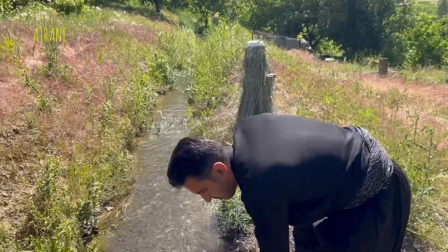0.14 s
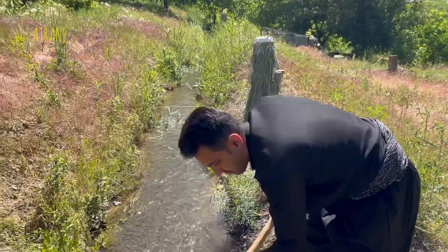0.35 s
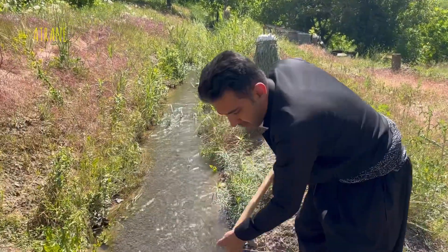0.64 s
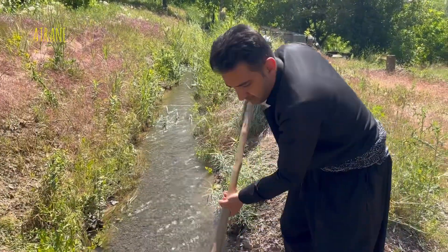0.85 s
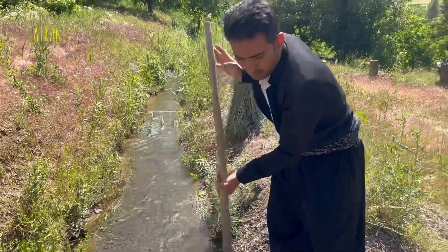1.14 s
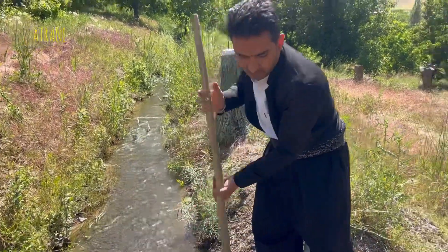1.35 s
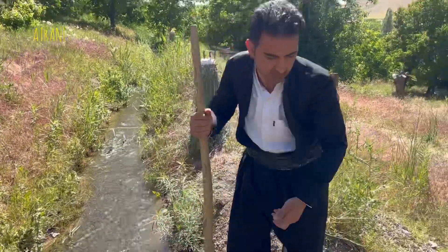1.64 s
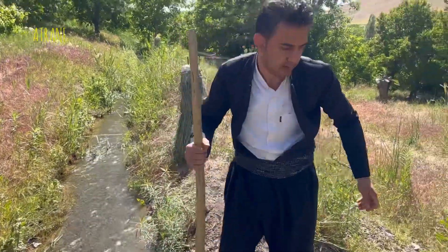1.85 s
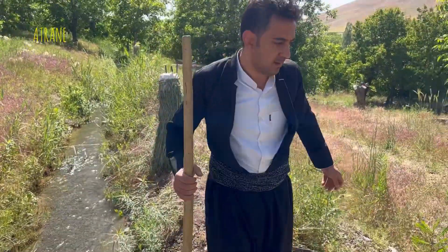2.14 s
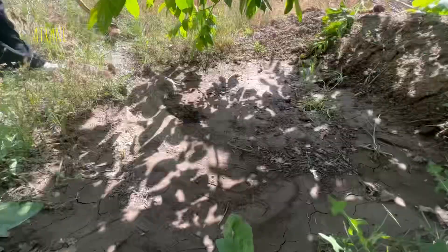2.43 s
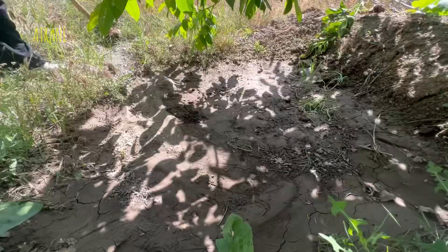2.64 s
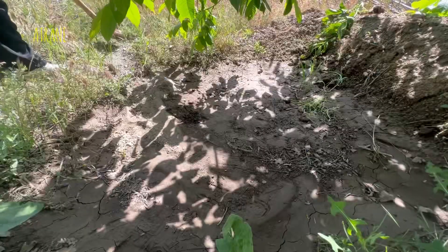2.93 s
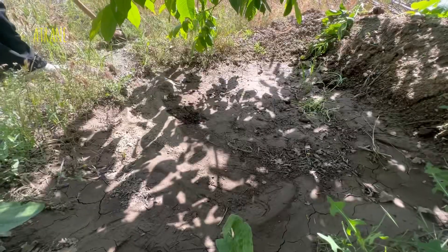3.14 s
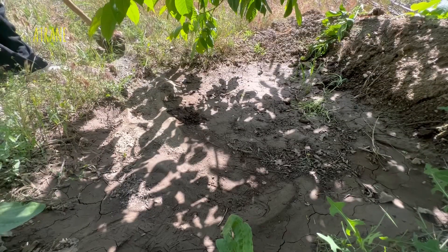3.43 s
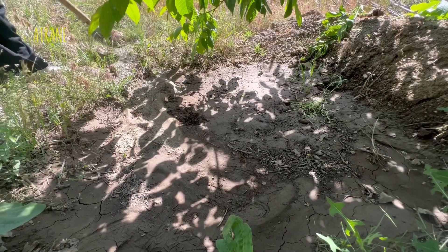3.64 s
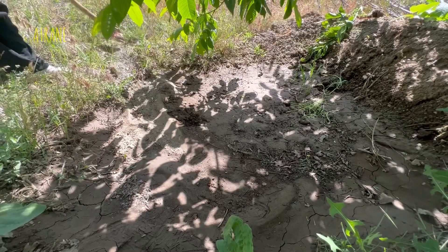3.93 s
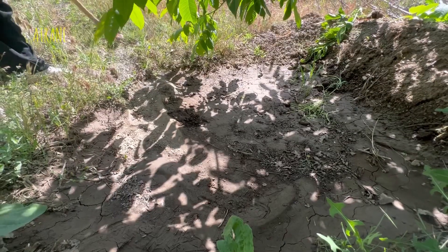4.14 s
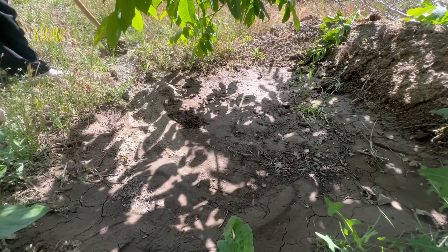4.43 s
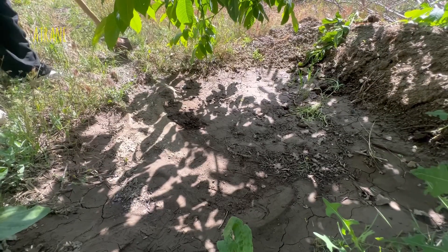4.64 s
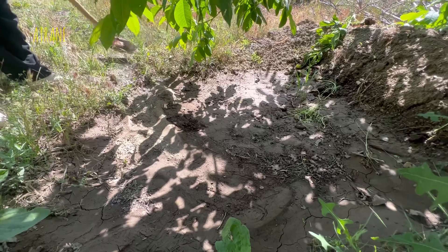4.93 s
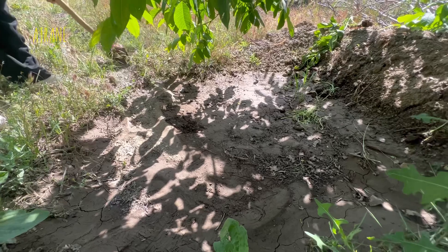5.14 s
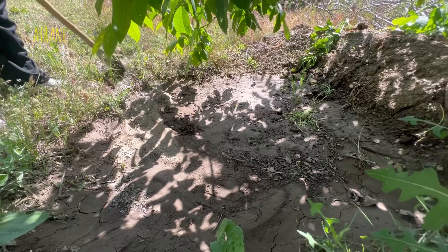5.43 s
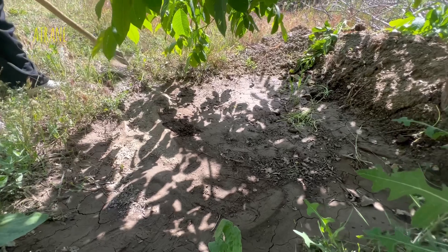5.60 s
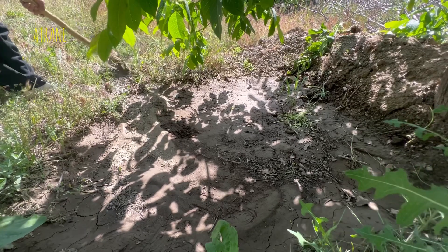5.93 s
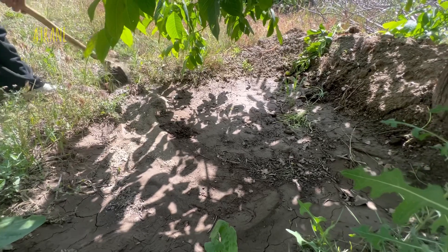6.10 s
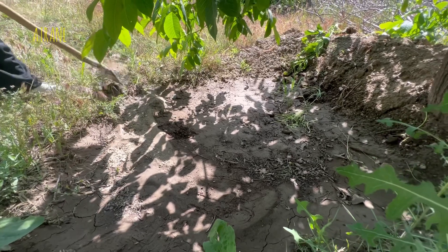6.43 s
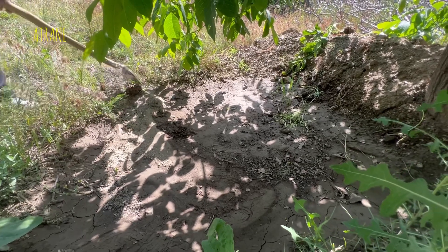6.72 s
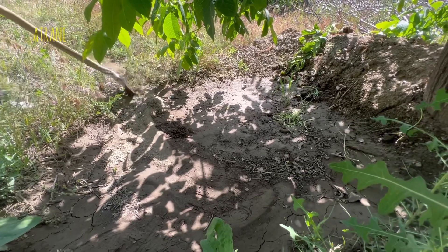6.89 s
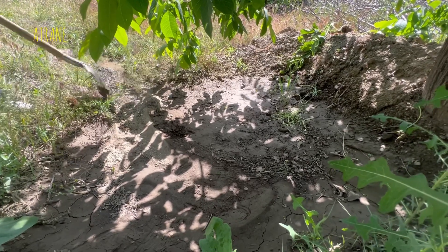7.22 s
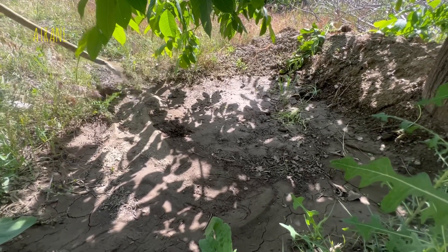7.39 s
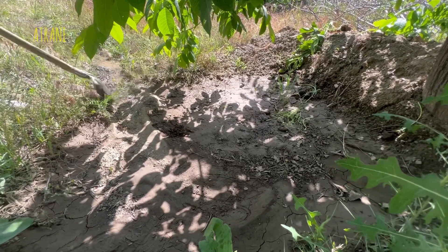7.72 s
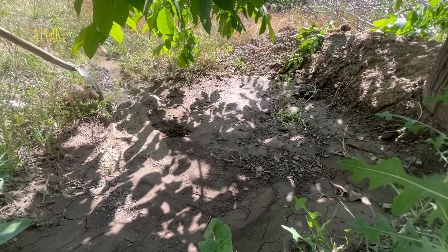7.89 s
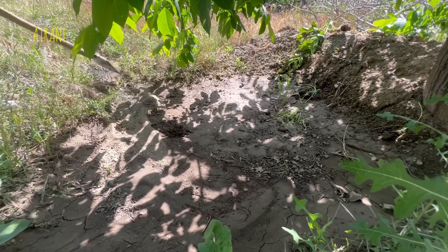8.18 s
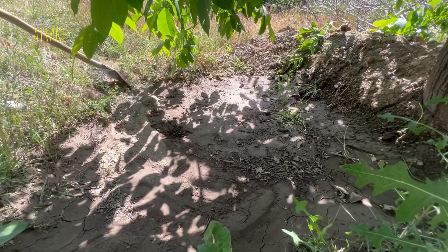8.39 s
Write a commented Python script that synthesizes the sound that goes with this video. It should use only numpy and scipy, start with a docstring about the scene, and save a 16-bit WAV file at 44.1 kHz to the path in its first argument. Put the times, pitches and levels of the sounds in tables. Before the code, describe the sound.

On an open bank, a hand stirs shallow water with quick bubbly plops, followed by a quiet gap and a dry double knock of a spade handle. The place then changes to tree shade, where a spade chops damp, stony soil three times, pushes through it twice with long gritty scrapes, and skims lightly three times. Crumbs patter after each stroke. Close stereo pickup, spade towards the left, with faint water and insects behind.

```python
"""First a hand dabbles in a muddy channel and a spade handle is grabbed with a knock, on an open bank.
Then, in the shade of a tree, the spade works damp soil: three chops, two long gritty pushes, three light skims.
The scrapes are bursts of noise broken into grains, filtered by the soil and by the ringing steel of the blade.
Bright clicks, mostly pebbles, are short pings and cracks; bubbles are fading tones that rise in pitch.
Far-off water and insects are steady filtered noise, with a puff of wind on the bank."""
import sys
import numpy as np
from scipy import signal
from scipy.fft import rfft, irfft, next_fast_len
from scipy.io import wavfile

SR = 44100
rng = np.random.default_rng(int(sys.argv[2]) if len(sys.argv) > 2 else 0)


def transcribe(u):
    """Save the signal u as a 16-bit wav file named by the first command-line argument.

    u: samples, shape (n,) or (channels, n), limited to [-1, 1]; the rate is SR.
    q: integer samples, one column per channel.
    """
    v = np.clip(np.atleast_2d(u).T, -1, 1)
    q = np.round(v * 32767).astype(np.int16)
    wavfile.write(sys.argv[1], SR, q)


N = 377055

# bright clicks: mostly pebbles on the blade edge, with a few dry stems or ticks;
# each use adds its own level: (t/s, level/dB, ring f/Hz)
BRIGHT_CLICKS = [(2.4825, -20, 4275), (2.5882, -20.5, 4480), (2.937, -43, 7280), (3.191, -20.5, 4260),
                 (3.217, -23, 4400), (3.255, -14, 3080), (3.3408, -19, 3700), (3.354, -17, 4040),
                 (3.426, -23, 4300), (3.6086, -36.5, 8810), (4.2198, -13.5, 5520), (4.239, -15.5, 4400),
                 (4.361, -18.5, 4380), (4.403, -16.5, 4340), (4.44, -20, 4510), (4.6618, -37.5, 4800),
                 (5.0207, -22, 4080), (5.14, -18, 4650), (5.1705, -14, 4650), (5.885, -16, 3590),
                 (5.9234, -17, 8060), (5.958, -19, 7030), (6.005, -27, 8600), (6.0214, -15, 6650),
                 (6.102, -15.5, 4900), (6.154, -20, 6900), (6.223, -21, 5100), (6.747, -37, 6450),
                 (7.627, -23, 4180), (7.655, -18, 4830), (8.3581, -25.5, 4580), (8.3917, -21, 4660),
                 (8.5028, -22, 4600)]
# colour of small bright snaps: (f/Hz, level/dB per Hz)
SNAP_COLOUR = [(1500, -2), (4000, -10), (7000, 6.5), (12000, -8), (16000, 7)]
# the blade is dragged through the soil; the scrape and crumb settings shift these levels:
# (t/s, length/s, crest after start/s, crest level/dB, arch/dB per s^2, release/dB per s,
#  bass weight at the crest/dB, treble grit at the crest/dB, spilled soil level/dB)
SOIL_DRAGS = [(2.488, 0.25, 0.33, -31, 75, 270, 3.5, -1.5, -59),
              (3.187, 0.27, 0.14, -26.5, 165, 282, 1, -5, -57),
              (4.267, 0.3, 0.19, -26.5, 353, 153, 0.5, -3, -57.5),
              (5.046, 0.34, .18, -23.5, 262, 380, -3.5, -2, -57.5),
              (5.88, 0.54, 0.14, -23.5, 88, 384, -1.5, 3, -56.5),
              (6.70, 0.32, 0.24, -36.5, 337, 151, 4.5, 1.5, -50),
              (7.574, 0.22, 0.12, -28, 1250, 162, 3, -0.5, -57),
              (8.398, .17, 0.18, -34.5, 50, 258, 3.5, -3, -60)]

MOVE_S = 2.36   # from the bank to the shade of the tree
T = np.arange(N) / SR
AGE = T[:2 * SR]   # time since an event began, in s
SIZE = next_fast_len(N + 8192)   # filter length, with room for tails
SIZE += SIZE % 2
HZ = np.maximum(np.arange(SIZE // 2 + 1) * SR / SIZE, 1)


def from_db(db):
    """Turns decibels into an amplitude factor."""
    return 10 ** (np.asarray(db) / 20)


def at_hz(points, hz=HZ, axis=1):
    """Reads one column of a spectrum on a log-frequency axis."""
    points = np.array(points)
    return np.interp(np.log(hz), np.log(points[:, 0]), points[:, axis])


def bell(hz, width):
    """Shape of a resonance around hz, 1 at the top."""
    return 1 / (1 + (2 * (HZ - hz) / width) ** 2)


def colour(x, spectrum_db):
    """Filters with this shape and no sound ahead of time (minimum phase); white noise keeps its power."""
    gain = from_db(spectrum_db)
    cepstrum = irfft(np.log(gain / np.sqrt(np.mean(gain ** 2))))
    # folding the cepstrum forward puts the whole response after its cause
    cepstrum[1:SIZE // 2] *= 2
    cepstrum[SIZE // 2 + 1:] = 0
    response = np.exp(rfft(cepstrum))
    return irfft(rfft(x, SIZE) * response)[..., :N]


def low_part(x, hz):
    """Keeps what lies below hz, without delay."""
    lowpass = signal.butter(2, hz, fs=SR, output="sos")
    return signal.sosfiltfilt(lowpass, x)


def add(out, s, sound):
    """Mixes a short sound in at time s."""
    start = int(np.clip(s * SR, 0, N - 1))
    out[start:start + len(sound)] += sound[:N - start]


def dying(t60):
    """Time axis and amplitude of a decay that loses 60 dB in t60 seconds."""
    t = np.arange(int(max(t60, .002) * SR * 1.2)) / SR
    return t, from_db(-60 * t / t60)


def bursts(rows):
    """Power envelope of sudden blows, each (t/s, level/dB, t60/s)."""
    power = np.zeros(N)
    for s, db, t60 in rows:
        _, fade = dying(t60)
        add(power, s, (from_db(db) * fade) ** 2)
    return power


def swell(attack, hold, fade_db_per_s):
    """Power envelope that rises, stays up until hold and then fades evenly in dB."""
    rise = np.minimum(AGE / max(attack, .001), 1) ** 2
    return rise * from_db(-fade_db_per_s * np.maximum(AGE - hold, 0)) ** 2


def grains(per_s, spread_db, t60):
    """Power envelope of many small random fractures, each dying away; its mean is 1."""
    starts = rng.random(N) < per_s / SR
    loudness_db = spread_db * np.minimum(rng.exponential(1, N), 3.5)
    sizes = starts * from_db(loudness_db) ** 2
    fade_per_sample = from_db(-120 / (t60 * SR))   # doubled dB because this is power
    power = signal.lfilter([1], [1, -fade_per_sample], sizes + 1e-18)
    return power / power.mean()


def drift(rate):
    """A slow random wander through rate new points a second."""
    points = rng.standard_normal(int(T[-1] * rate) + 2)
    return 1.2 * np.interp(T * rate, np.arange(len(points)), points)


def airy_noise(alike):
    """White stereo noise, partly the same on both sides."""
    alike = np.clip(alike, 0, 1)
    shared = rng.standard_normal(N)
    separate = rng.standard_normal((2, N))
    return np.sqrt(alike) * shared + np.sqrt(1 - alike) * separate


def wind_strength():
    """A light breeze on the open bank, with one puff that swells and dies away."""
    breeze_db, puff_db = -78.5, -63
    power = from_db(breeze_db) ** 2 * (T < MOVE_S)
    add(power, 0.555, from_db(puff_db) ** 2 * swell(attack=0.099, hold=0.465, fade_db_per_s=200))
    return np.sqrt(power)


def outdoors(bank_db, pan_db):
    """Trickling noise on the bank, smoother noise with insects under the tree, and rumbling wind."""
    # distant water and insects in the two places: (f/Hz, level/dB per Hz)
    bank_colour = [(25, -18), (60, 0.5), (150, 2), (400, 2.5), (900, -6), (2000, -2), (3300, -5.5),
                   (5000, -4), (6200, -1.5), (7100, 3.5), (8000, 0.5), (9200, -22), (15500, -3.5)]
    shade_colour = [(25, -4), (60, 2), (150, -1.5), (400, -3.5), (900, -5.5), (2000, -3), (3300, -9.5),
                    (5000, -10.5), (6200, -2), (7100, 2.5), (8000, -3.5), (10000, -13), (12500, -36),
                    (15500, -20)]
    # water and insects under the tree, before panning: (t/s, level/dB)
    shade_level = [(2.4, -59), (4, -61.5), (5.7, -58.5), (6.6, -59.5), (7.3, -60), (7.95, -60), (8.25, -65)]
    # the thin band of the insects: (f/Hz, width/Hz, lift/dB)
    insect_band = (7320, 100, 2.3)
    # wind on the microphone: (f/Hz, level/dB per Hz)
    wind_colour = [(20, -21), (45, 0), (75, -3.5), (130, -15), (400, -35), (2000, -78)]
    trickle = np.sqrt(.5 + .5 * grains(per_s=300, spread_db=3, t60=0.0075))
    bank = from_db(bank_db) * colour(airy_noise(0.53) * trickle, at_hz(bank_colour))
    hz, width, lift_db = insect_band
    air = colour(airy_noise(0.1), at_hz(shade_colour) + lift_db * bell(hz, width))
    times, levels_db = np.transpose(shade_level)
    sides = from_db([[pan_db / 2], [-pan_db / 2]])
    shade = from_db(np.interp(T, times, levels_db)) * air * sides
    flutter = from_db(1.6 * drift(24.64))
    wind = wind_strength() * flutter * colour(airy_noise(0.95), at_hz(wind_colour))
    return np.where(T < MOVE_S, bank, shade) + wind


def ticks(tick_db, t60):
    """Droplets and dry stems make tiny bright snaps of noise."""
    # level before tick_db is added: (t/s, level/dB)
    tick_rows = [(0.0435, -26), (0.175, -27), (0.402, -29), (0.5386, -29), (0.6244, -30), (0.6726, -31),
                 (1.099, -35), (1.1545, -27), (1.4663, -17), (3.528, -26.5), (4.9187, -50), (6.552, -41),
                 (6.748, -22.5)]
    power = bursts([(s, db + tick_db, t60) for s, db in tick_rows])
    return colour(airy_noise(0.25) * np.sqrt(power), at_hz(SNAP_COLOUR))


def bubble(hz, cycles, rise):
    """A trapped bubble fades by 60 dB over some cycles of hz, rising in pitch as it nears the surface."""
    t, fade = dying(cycles / hz)
    onset = 1 - np.exp(-2 * hz * t)
    return fade * onset * np.sin(2 * np.pi * hz * t * (1 + rise * t * hz / cycles))


def stirring():
    """How hard the water moves: each splash swells and dies away over a steady trickle."""
    # the hand stirs the water; fizz and wash shift these levels: (t/s, level/dB, hold/s)
    splash_rows = [(0.022, -45, 0.054), (0.13, -50, 0.073), (0.278, -54.5, 0.094), (0.457, -48, .06),
                   (0.544, -54, 0.088), (1.737, -60.5, 0.073), (2.079, -52.5, 0.062), (2.221, -67, .09)]
    trickle_db = -64.5   # shifted in the same way
    power = np.full(N, from_db(trickle_db) ** 2)
    for s, db, hold in splash_rows:
        add(power, s, from_db(db) ** 2 * swell(attack=0.016, hold=hold, fade_db_per_s=149))
    return np.sqrt(power) * (T < MOVE_S)


def little_bubbles(count=1100):
    """A crowd of small bubbles scattered over the time at the bank, brought to an even overall level."""
    crowd = np.zeros((2, N))
    for when, pitch, size, side, depth in rng.random(size=(count, 5)):
        # most bubbles are of one middling size, and these are also the loudest
        hz = np.clip(2000 * (pitch / (1 - pitch)) ** .27, 550, 7500)
        loudness = from_db(13.7 * size ** 2) / (1 + (hz / 4200) ** 2) / (1 + (900 / hz) ** 2)
        # shallow bubbles ring briefly and chirp, deep ones hold their pitch
        small = loudness * bubble(hz, cycles=14 + 32 * depth, rise=0.32 * (1 - depth))
        add(crowd[0], when * MOVE_S, small * np.sqrt(side))
        add(crowd[1], when * MOVE_S, small * np.sqrt(1 - side))
    return crowd / crowd[:, T < MOVE_S].std()


def water(plop_db, slap_db, fizz_db, wash_db, pan_db):
    """A few large bubbles, each born in a small slap, over a crowd of little ones and a soft wash."""
    # larger bubbles; plop and slap shift the level: (t/s, level/dB, nominal f/Hz)
    plop_rows = [(0.044, -43, 1210), (0.068, -54, 1690), (0.085, -36, 1820), (0.12, -39, 2340),
                 (0.151, -41.5, 2200), (0.195, -44.5, 657), (0.278, -48, 1090), (0.334, -48, 1460),
                 (0.43, -40.5, 2260), (0.456, -38, 1120), (0.474, -39.5, 2180), (0.531, -54, 544),
                 (0.567, -49, 1630), (0.625, -44, 2830), (0.645, -55, 636), (0.674, -44, 2440),
                 (0.752, -47, 2540), (0.784, -55, 1360), (2.008, -50, 2200), (2.345, -59, 425)]
    # wash of the moving water: (f/Hz, level/dB per Hz)
    wash_colour = [(150, -20), (400, -27), (600, 0), (1200, -1), (2500, 6.5), (4000, -9), (6500, 1),
                   (9000, -12), (15000, -10)]
    plops = np.zeros((2, N))
    leans_db = rng.normal(pan_db, 2, len(plop_rows))   # mostly towards the left
    for (s, db, hz), lean in zip(plop_rows, leans_db):
        # starting below the nominal pitch, since it rises
        plop = from_db(db + plop_db) * bubble(hz * .93, cycles=61, rise=0.363)
        add(plops[0], s, plop * from_db(lean / 2))
        add(plops[1], s, plop * from_db(-lean / 2))
    splash = stirring()
    fizz = splash * from_db(fizz_db) * little_bubbles()
    churn = (splash * from_db(wash_db)) ** 2 * grains(per_s=1100, spread_db=3.0, t60=0.039)
    slaps = bursts([(s, db + slap_db, .05) for s, db, hz in plop_rows])
    wash = colour(airy_noise(0.33) * np.sqrt(churn + slaps), at_hz(wash_colour))
    return plops + fizz + wash


def knock():
    """The spade is jolted by its handle: a dry double clack of noise."""
    # (t/s, level/dB, t60/s)
    knock_rows = [(1.469, -30.5, 0.044), (1.476, -45, 0.089)]
    # (f/Hz, level/dB per Hz)
    knock_colour = [(100, -12), (400, -7), (1000, -3), (1660, -3), (2800, 2.5), (4300, 1), (6000, 6),
                    (9000, -8), (15000, -6)]
    return colour(airy_noise(0.66) * np.sqrt(bursts(knock_rows)), at_hz(knock_colour))


def settling_crumbs(crumb_db, fall_s, spread_db, t60, count=60):
    """Spilled soil patters into the grass: thickly as a drag ends, then ever more thinly and softly."""
    fade_db_per_s = 21
    falls = []
    for s, length, *_, spill_db in SOIL_DRAGS:
        delays = rng.exponential(fall_s, count)
        sizes_db = rng.normal(0, spread_db, count)
        for delay, size_db in zip(delays, sizes_db):
            level_db = spill_db + crumb_db + size_db - fade_db_per_s * delay
            falls.append((s + length + delay, level_db, t60))
    power = bursts([row for row in falls if row[0] < T[-1]])
    return colour(airy_noise(0.54) * np.sqrt(power), at_hz(SNAP_COLOUR))


def singing_blade():
    """Low modes of the steel, near 1200 and 1665 Hz, ring on undamped, kept wavering by sliding crumbs."""
    # the blade sings, once with the knock and then among the strokes: (t/s, level/dB, f/Hz, t60/s)
    sing_rows = [(1.467, -38, 1663, 0.079), (4.291, -41, 1200, 0.11), (6.408, -53.5, 1200, 0.31),
                 (7.0, -49.5, 1665, 0.24), (7.80, -53, 1665, 0.46)]
    out = np.zeros(N)
    for s, db, hz, t60 in sing_rows:
        t, fade = dying(t60)
        waver = (1 + .6 * (drift(70) + 1j * drift(70)))[:len(t)]   # in loudness and phase
        onset = 1 - np.exp(-t / 0.0017)
        add(out, s, from_db(db) * fade * onset * np.imag(waver * np.exp(2j * np.pi * hz * t)))
    return out


def bright_clicks(ring_db, crack_db, ring_t60, crack_t60):
    """Each click, mostly a pebble on the steel, is a bright crack of noise and a very short ping."""
    cracks = bursts([(s, db + crack_db, crack_t60) for s, db, hz in BRIGHT_CLICKS])
    out = colour(rng.standard_normal(N) * np.sqrt(cracks), at_hz(SNAP_COLOUR))
    for s, db, hz in BRIGHT_CLICKS:
        t, fade = dying(ring_t60)
        add(out, s, from_db(db + ring_db) * fade * np.sin(2 * np.pi * hz * t))
    return out


def falling_clods():
    """Clods of soil drop with a dull bump of noise."""
    # (t/s, level/dB, t60/s)
    clod_rows = [(2.449, -41, 0.06), (3.354, -26, 0.095), (4.239, -43, 0.039), (4.44, -33.5, 0.12),
                 (5.886, -29, 0.16), (6.075, -28.5, 0.095), (7.915, -55, 0.25), (8.482, -40, 0.15)]
    # (f/Hz, level/dB per Hz)
    clod_colour = [(40, -16), (130, -1), (550, 1.5), (900, -1), (2500, -4), (5000, -36)]
    return colour(rng.standard_normal(N) * np.sqrt(bursts(clod_rows)), at_hz(clod_colour))


def crumbling_noise(patchy_db, rate, count=30):
    """Two unrelated noises whose bands swell and fade as crumbs of different size pass the blade."""
    white = rfft(rng.standard_normal((2, SIZE)).astype(np.float32))
    place = np.interp(np.log(HZ + 800), np.log([800, 13000]), [0, count - 1])   # band number of each pitch
    out = 0
    for band in range(count):
        share = np.maximum(1 - np.abs(place - band), 0).astype(np.float32)
        out = out + irfft(white * share)[:, :N] * from_db(patchy_db * drift(rate))
    return out / out.std()


def strokes():
    """Each stroke has bite, arching drag and spill; returns their power, and their bass and grit in dB."""
    # the edge bites into the ground; the scrape setting shifts the level:
    # (t/s, level/dB, hold/s, bass weight/dB)
    bite_rows = [(2.45, -46, .016, 11), (2.469, -29, 0.035, -1), (2.582, -26.5, 0.012, -1),
                 (3.141, -32, 0.0086, 2.5), (3.175, -26.5, 0.0075, -4), (4.203, -25.5, 0.034, 4),
                 (5.01, -24, .018, -0.5), (5.09, -24, 0.013, 8.5), (5.8, -46, 0.068, 13),
                 (5.896, -29, 0.031, 19), (6.38, -36, 0.041, -19), (6.854, -35.5, .015, -20),
                 (7.489, -39, 0.062, 8), (8.348, -27.5, .05, -9)]
    # bass and grit fall as the soil slides off the blade
    unload_db_per_s, dulling_db_per_s = 11, 4
    contacts = []
    for s, db, hold, weight_db in bite_rows:
        bite = from_db(db) ** 2 * swell(attack=0.0087, hold=hold, fade_db_per_s=450)
        contacts.append((s, bite, weight_db, 2.5))   # 2.5 dB of grit
    for s, length, crest, db, arch, release, weight_db, grit_db, spill_db in SOIL_DRAGS:
        past_crest = np.minimum(AGE, length) - crest   # negative before the crest
        drag = from_db(db - arch * past_crest ** 2) ** 2 * swell(0.0091, length, release)
        drag_weight_db = weight_db - unload_db_per_s * past_crest
        drag_grit_db = grit_db - dulling_db_per_s * past_crest
        contacts.append((s, drag, drag_weight_db, drag_grit_db))
        # loose soil spills after each drag, fading slowly
        spill = from_db(spill_db) ** 2 * swell(attack=.04, hold=.04, fade_db_per_s=30)
        contacts.append((s + length, spill, 3, 8))   # 3 dB of bass, 8 dB of grit
    total, weight, grit = np.full(N, 1e-18), np.zeros(N), np.zeros(N)
    for s, power, weight_db, grit_db in contacts:
        add(total, s, power)
        add(weight, s, power * weight_db)
        add(grit, s, power * grit_db)
    # where contacts overlap, the stronger one counts for more in the tone
    return total, weight / total, grit / total


def with_echoes(x):
    """The ground and the earth bank throw the sound back within milliseconds."""
    # (delay/s, level/dB)
    echo_rows = [(.0019, -35.5), (.0043, -29.5), (.0078, -24)]
    out = x
    for delay, db in echo_rows:
        late = np.array([np.interp(T - delay, T, side, left=0) for side in x])
        out = out + from_db(db) * late
    return out


def from_the_left(direct, scattered):
    """The left port leads and is mostly louder; scatter from the ground makes the two sides differ."""
    # the spade at the two microphone ports: (f/Hz, left minus right/dB)
    side_balance = [(100, 1.5), (300, 0), (600, 6), (1100, 5), (1700, 2.5), (3000, 1.5), (4000, 3.5),
                    (5000, 10), (6500, 7.5), (8100, 11.5), (9500, -2), (12000, 0)]
    # (f/Hz, likeness of the two sides from 0 to 1)
    side_likeness = [(100, 0.94), (800, 0.9), (1300, 0.28), (2400, 0.65), (3800, 0.33), (4800, 0.41),
                     (6000, 0.17), (10000, 0.24), (11200, 1), (13200, 0.6), (15500, 1)]
    # (f/Hz, phase by which the left leads/radians)
    left_lead = [(20, 0), (250, .35), (1000, 2.3), (2000, 3.8), (3200, 10.5), (4400, 12.6), (6000, 14.8),
                 (8000, 10.4), (11000, 9.3), (12400, 6.3), (14700, 6.3), (16000, 3.3)]
    alike = np.clip(at_hz(side_likeness), 0, 1)
    lean = from_db(at_hz(side_balance))
    common = np.sqrt(1 + alike) * rfft(direct, SIZE)
    apart = np.sqrt(1 - alike) * rfft(scattered, SIZE)
    left = (common + apart) * lean
    right = (common - apart) * np.exp(-1j * at_hz(left_lead))
    return irfft(np.array([left, right]) / np.sqrt(1 + lean ** 2))[:, :N]


def spade(scrape_db, click_db, grainy, slipping):
    """Soil grains crack against the blade, clumped as the soil sticks and slips; the blade colours them."""
    # times of the chops, the pushes and the skims: (from t/s, to t/s)
    stroke_kinds = [(2.4, 4.9), (4.9, 6.62), (6.62, 8.6)]
    # soil giving way: (f/Hz, then level/dB per Hz when chopping, pushing, skimming)
    soil_colour = [(30, -44, -33, -59), (69.5, -15, -14, -14.5), (134, -5, -5, -9), (410, -13.5, -8, -6.5),
                   (1040, -6.5, -9.5, -12), (2140, -6, -7, 0), (3400, -0.5, -1, 1.5), (4470, 1, -1, 1.5),
                   (6640, -2.5, -4, -0.5), (9300, -5, -2.5, 1), (10100, -6.5, -5.5, -4),
                   (11500, -16.5, -15, -9.5), (15200, -16.5, -17, -11.5)]
    # blade resonances, damped differently as the soil grips:
    # (f/Hz, width/Hz, then lift/dB when chopping, pushing, skimming)
    blade_modes = [(536, 110, 7.5, 6, -3), (777, 220, 6.5, 4.6, 3), (1176, 180, 5, 4.8, 9.5),
                   (1647, 88, 6.5, 8.5, 11), (2252, 21, -24, 9.1, 9.5), (2385, 63, -5.5, 7.7, -18),
                   (2880, 33, -2, 12.8, -2), (3050, 60, 4.5, 1.8, 3), (3640, 35, 8, 2.1, 6),
                   (3870, 53, -3, 1.1, 6.5), (4620, 90, -1, 1, 5), (5064, 280, 3.5, 8.8, 10.5),
                   (5710, 75, 7.5, 9.6, 9), (6055, 114, -15, 5.9, 8.5), (6700, 140, -1, 7.4, 8.5),
                   (8130, 89, 10.5, 10.4, 10.5), (8880, 126, 7.5, 3.5, 9.5)]
    # shadows of the microphone housing: (f/Hz, width/Hz, level/dB)
    housing_notches = [(5217, 220, -14), (7700, 360, -13)]
    effort, weight_db, grit_db = strokes()
    grainy, slipping = np.clip([grainy, slipping], 0, 1)
    sand = 1 - grainy + grainy * grains(per_s=1800, spread_db=3.5, t60=0.0053)
    slips = 1 - slipping + slipping * grains(per_s=120, spread_db=7.5, t60=0.032)
    scrape = effort * from_db(scrape_db) ** 2 * sand * slips
    # the bright clicks also add noise with the colour of soil and blade, with little bass (-3 dB)
    clatter = bursts([(s, db + click_db, 0.049) for s, db, hz in BRIGHT_CLICKS])
    power = scrape + clatter
    weight_db = (scrape * weight_db + clatter * -3) / power
    force = np.sqrt(power) * crumbling_noise(patchy_db=3.3, rate=45)
    housing_db = sum(db * bell(hz, width) for hz, width, db in housing_notches)
    mode_shapes = np.array([bell(hz, width) for hz, width, *_ in blade_modes])
    blade_db = np.array(blade_modes)[:, 2:].T @ mode_shapes
    sound = 0
    for kind, (start, end) in enumerate(stroke_kinds):
        during = (T >= start) & (T < end)
        tone_db = at_hz(soil_colour, axis=kind + 1) + blade_db[kind] + housing_db
        sound = sound + colour(force * during, tone_db)
    # packed earth thuds, loose sand hisses
    bass = low_part(sound, hz=1230)
    treble = sound - low_part(sound, hz=7340)
    sound = sound + bass * (from_db(weight_db) - 1) + treble * (from_db(grit_db) - 1)
    direct, scattered = with_echoes(sound)
    clicks = bright_clicks(ring_db=-5.5, crack_db=-2, ring_t60=0.05, crack_t60=0.005)
    return from_the_left(direct + falling_clods() + clicks, scattered)


def scene():
    """Water and handle first, then the digging, all in open air."""
    air = outdoors(bank_db=-60, pan_db=3.5)
    snaps = ticks(tick_db=-4.5, t60=0.009)
    channel = water(plop_db=0, slap_db=-6.5, fizz_db=-3.5, wash_db=-6.0, pan_db=4.5)
    crumbs = settling_crumbs(crumb_db=1, fall_s=.2, spread_db=4, t60=0.012)
    # grainy: share of the scrape that comes as separate cracking grains
    digging = spade(scrape_db=-1.4, click_db=-3.5, grainy=.43, slipping=0.17)
    return air + snaps + channel + knock() + crumbs + singing_blade() + digging


def record(dry):
    """Cuts the top steeply above 15.5 kHz."""
    steep_cut = signal.ellip(10, .1, 80, 15500, fs=SR, output="sos")
    return signal.sosfilt(steep_cut, dry)


dry = scene()
out = record(dry)
transcribe(out)
```